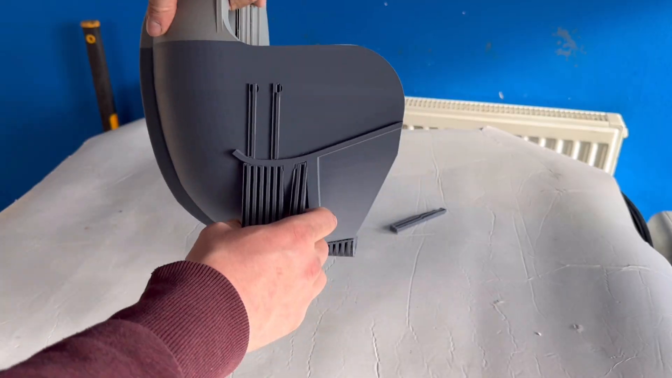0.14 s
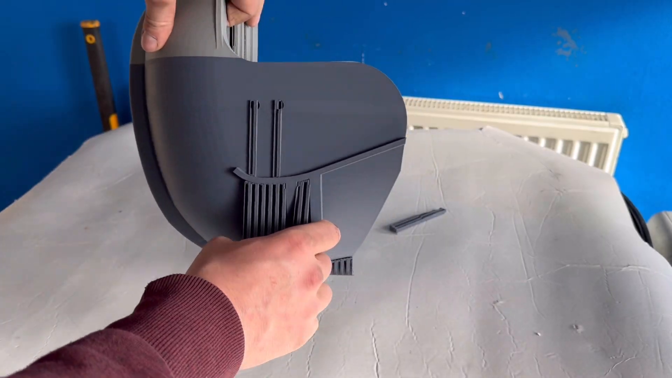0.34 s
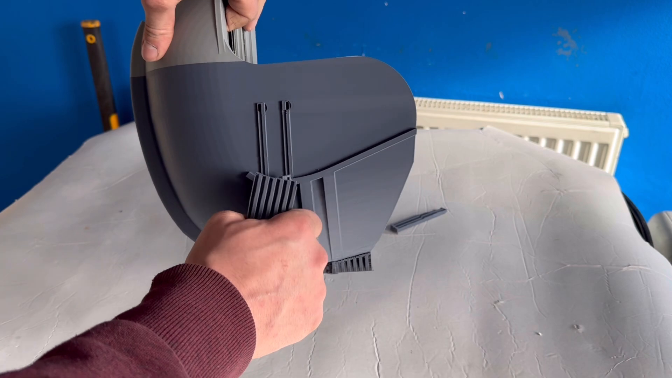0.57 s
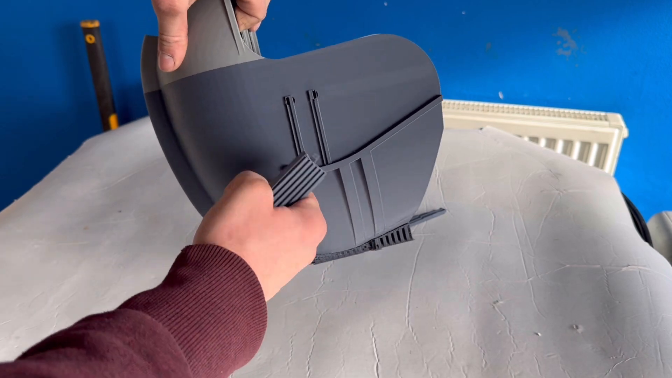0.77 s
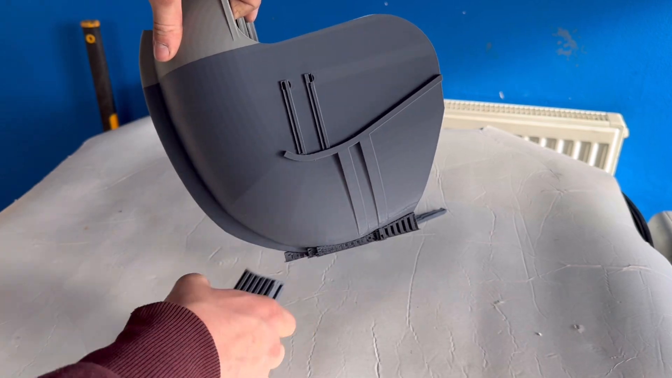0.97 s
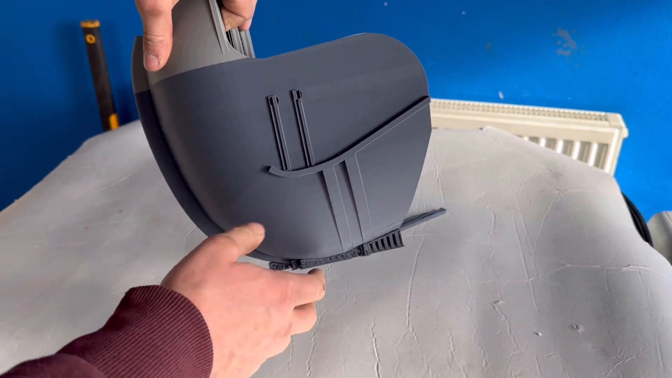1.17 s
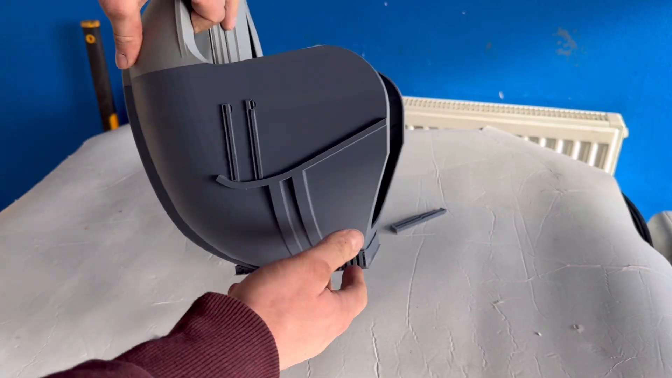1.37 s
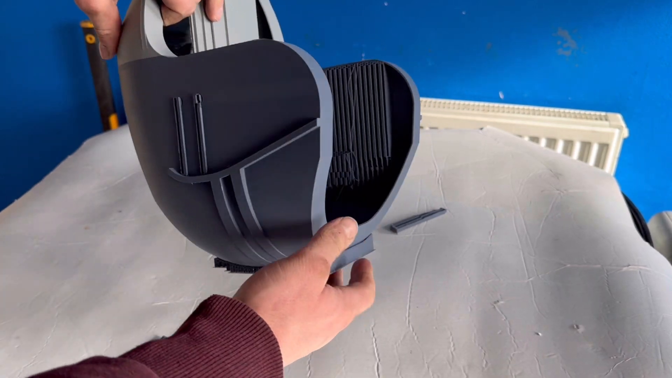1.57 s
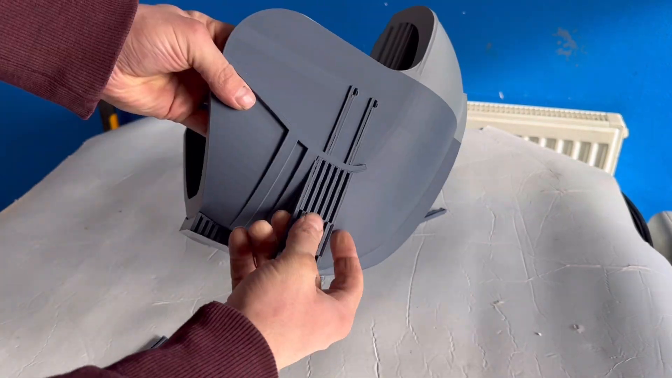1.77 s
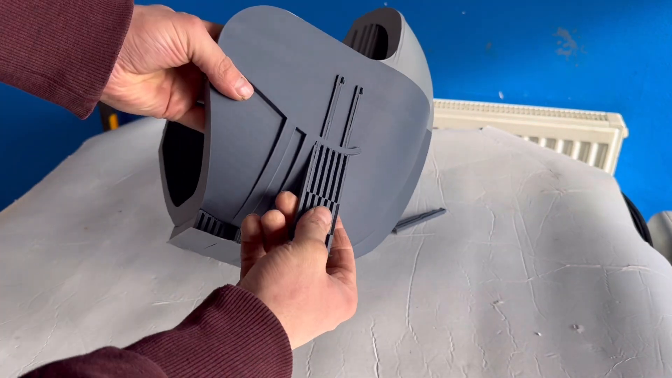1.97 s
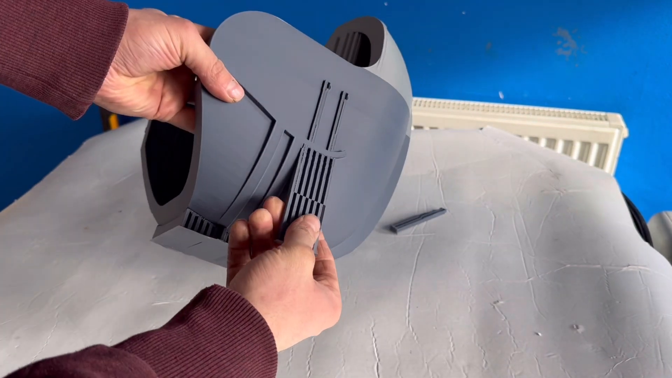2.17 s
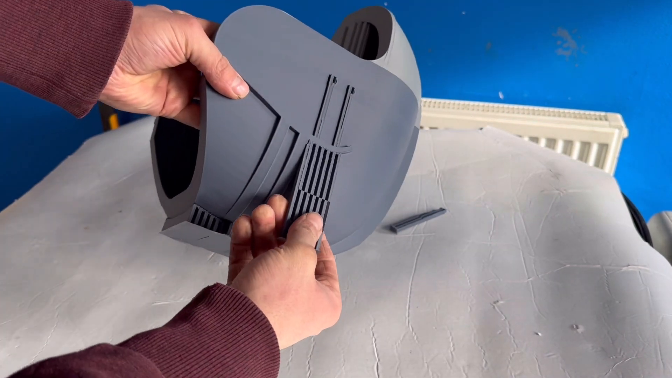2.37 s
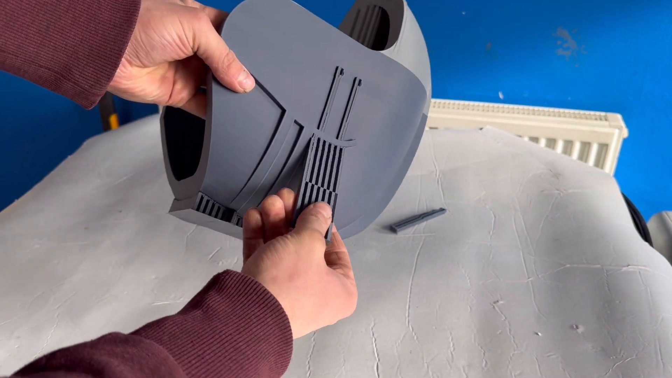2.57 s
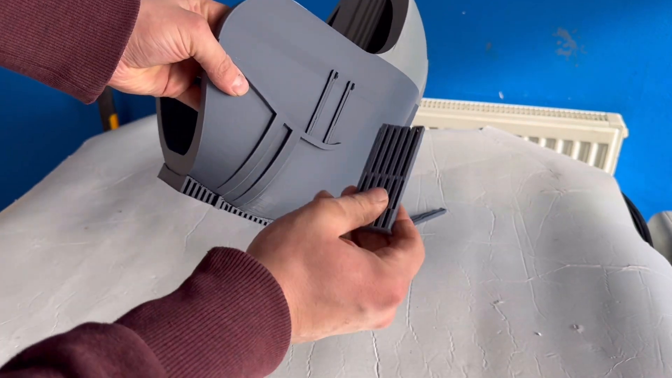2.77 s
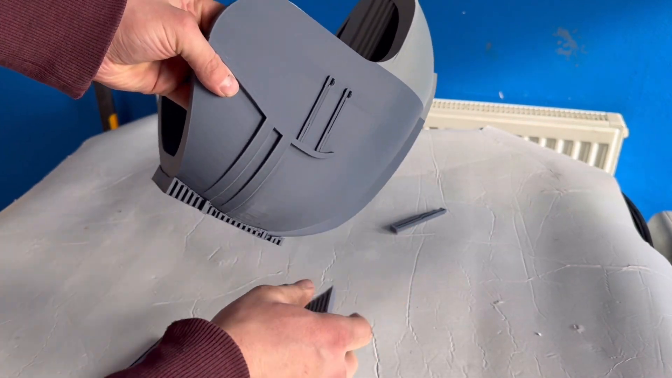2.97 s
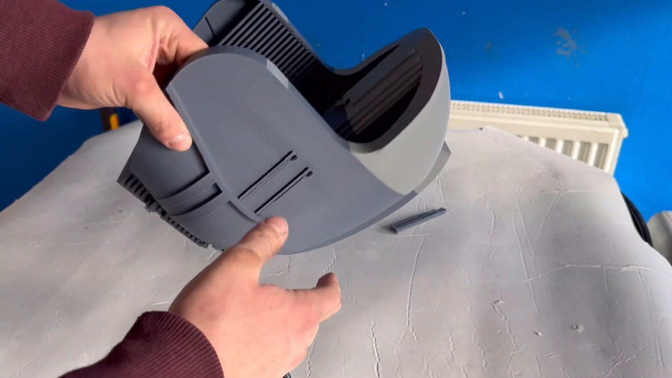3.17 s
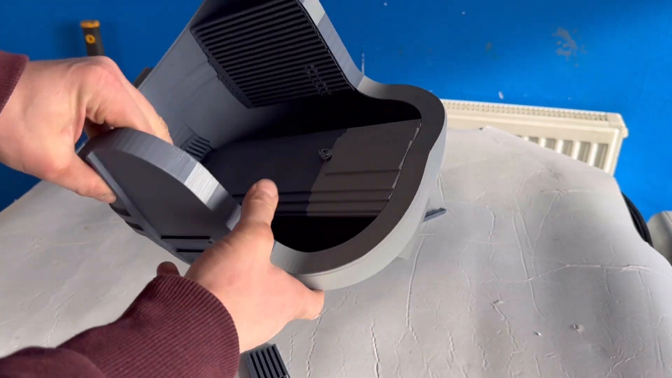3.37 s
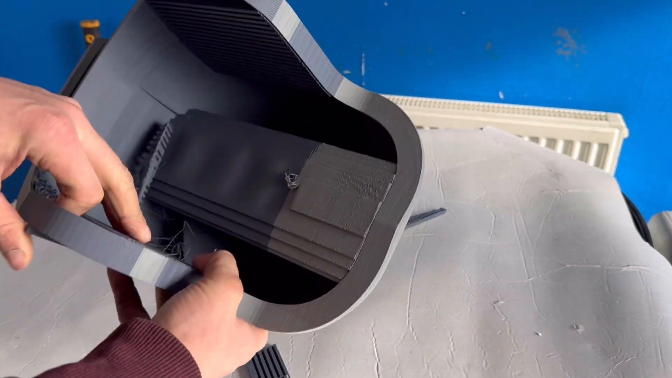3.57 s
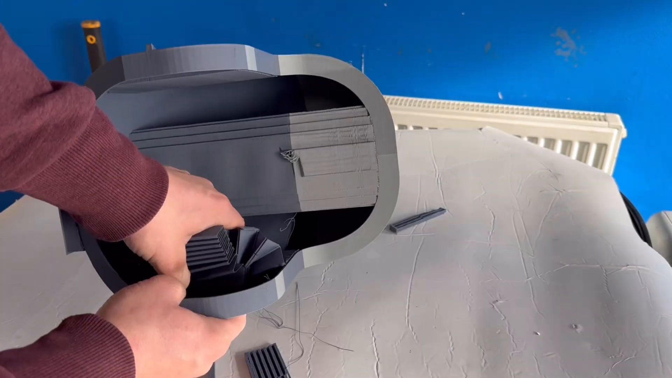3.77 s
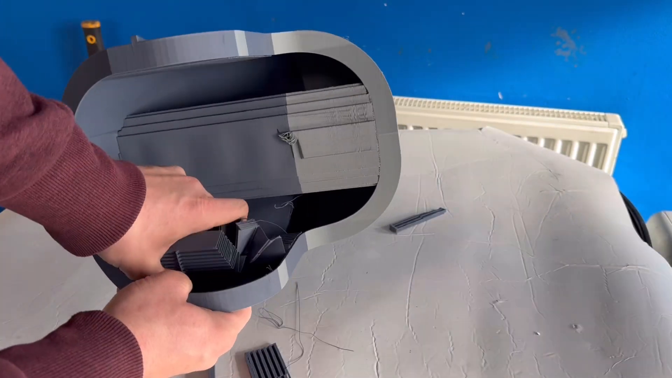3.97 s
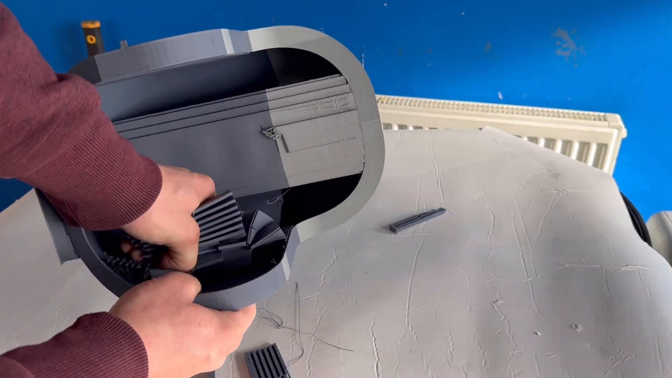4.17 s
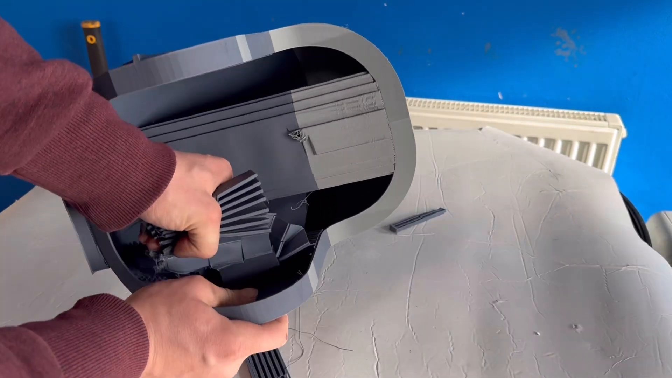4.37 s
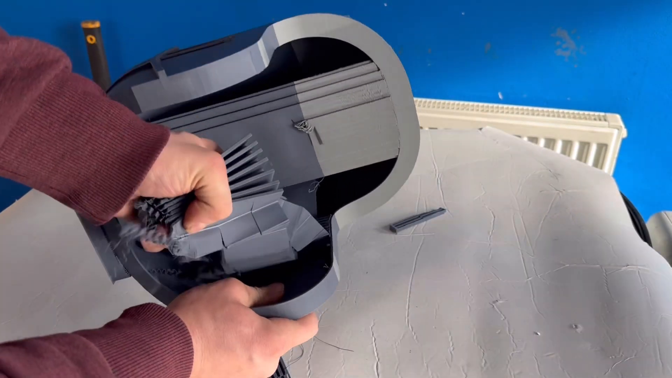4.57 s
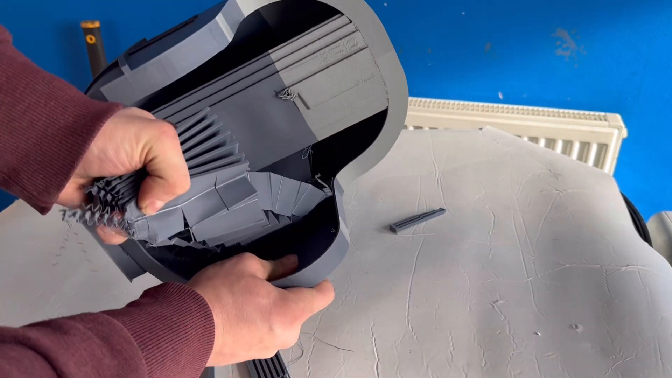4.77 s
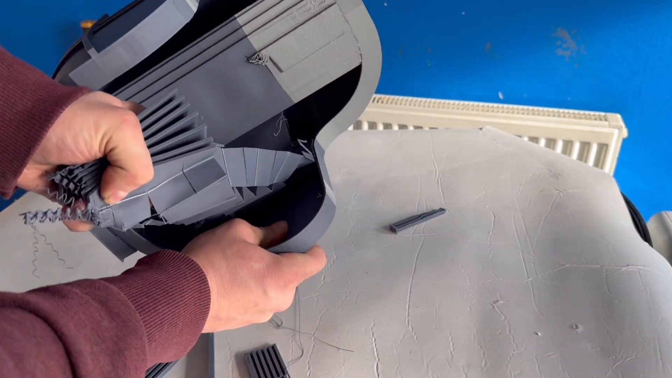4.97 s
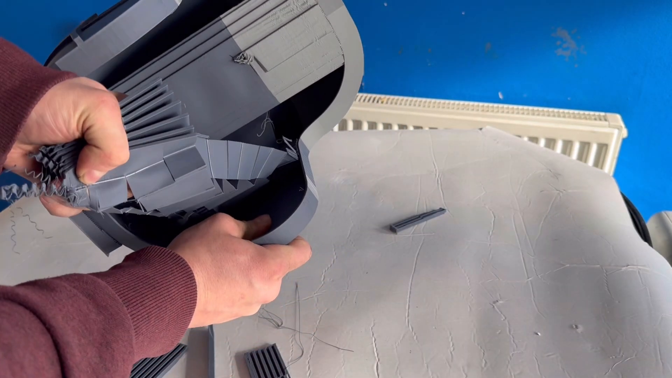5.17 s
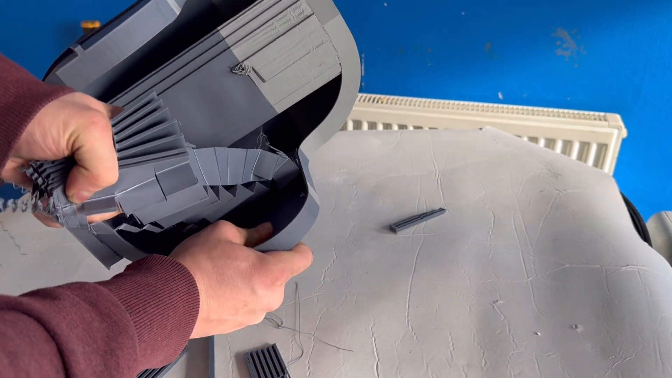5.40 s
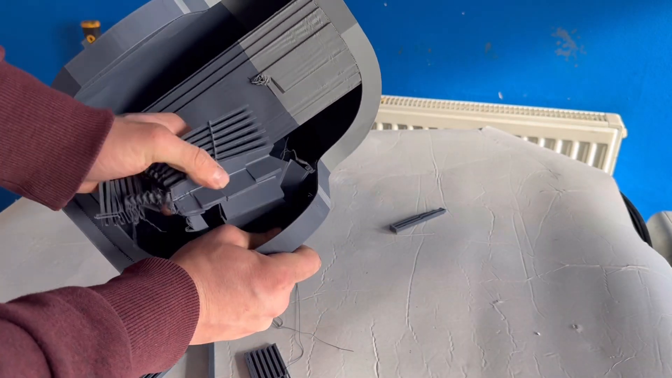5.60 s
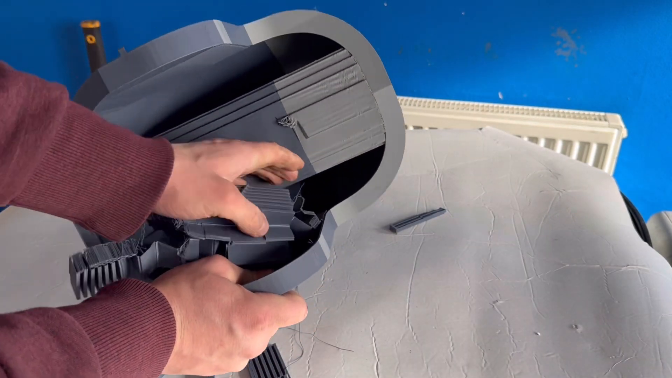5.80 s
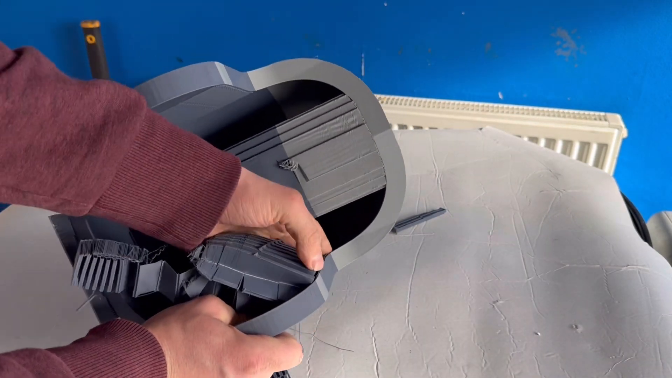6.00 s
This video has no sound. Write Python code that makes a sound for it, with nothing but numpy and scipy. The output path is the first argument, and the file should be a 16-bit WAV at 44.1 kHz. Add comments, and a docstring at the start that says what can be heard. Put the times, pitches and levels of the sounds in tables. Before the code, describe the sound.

Close stereo sound in a small, hard room: soft handling bumps and tiny ticks, a crisp plastic crack, a loose bit landing, faint creaking crackle, another brief snap, more bits dropping and a hand clacking onto the shell. Then supports inside the hollow part tear away in a rapid volley of bright cracks and boxy pops, with isolated snaps afterwards and a short rough scrape at the end.

```python
"""Struts snap singly and in rips as hands tear the thin lattice off a hollow 3D-printed plastic shell.
Close by, the strained lattice crackles and the shell answers each release with a short hollow note.
Loose pieces land on the table, the last support judders out and handling gives dull bumps.
Ragged forces ring damped modes and coloured cracks; noise gives the tails of a small, hard room.
Two microphones hear it: alike in the bass, apart in the treble, the left one nearer."""
import sys
import numpy as np
from scipy import signal
from scipy.fft import rfft, irfft, next_fast_len
from scipy.io import wavfile
from scipy.ndimage import map_coordinates

SR = 44100
rng = np.random.default_rng(int(sys.argv[2]) if len(sys.argv) > 2 else 0)


def pcm_store(signal):
    """Save signal as 16-bit PCM."""
    levels = np.round(np.clip(np.atleast_2d(signal), -1, 1) * 32767)
    wavfile.write(sys.argv[1], SR, levels.astype(np.int16).T)


N = 266364

# Event levels are at the source, ahead of each function's trims, the room and the microphones.
# breaking struts and knocks of the lattice on the shell:
# (time [s], crack [dB], lattice clack [dB], strut pitch [Hz], strut ring [dB])
STRUT_SNAPS = [(0.461, -21, -37, 960, -30.5), (0.51, -22, -26.5, 2610, -22.5),
               (1.326, -37.5, -49, 2030, -49), (1.671, -40, -45, 950, -47),
               (1.701, -30.5, -48.5, 2600, -42), (1.837, -30, -44.5, 1800, -44.5),
               (1.87, -33, -49, 1900, -40.5), (2.593, -26, -36.5, 1130, -43),
               (2.604, -22.5, -29.5, 1160, -34), (2.851, -59, -48.5, 3370, -55),
               (3.719, -22.5, -21.5, 1207, -31.5), (3.731, -28.5, -21.5, 1200, -25),
               (3.916, -35, -29.5, 7750, -50), (4.022, -37.5, -28.5, 7940, -35.5),
               (4.052, -25, -21, 910, -25), (4.104, -34.5, -31.5, 7200, -29), (4.16, -32, -29.5, 1220, -35),
               (4.202, -24, -21, 1300, -21), (4.29, -27, -28.5, 1360, -30),
               (4.3, -18.5, -14.5, 1400, -23.5), (4.335, -21, -18, 1290, -24),
               (4.388, -23, -17.5, 3090, -20.5), (4.416, -29.5, -22, 1370, -17),
               (4.448, -20.5, -18.5, 1454, -18), (4.479, -23, -24.5, 1430, -23.5),
               (4.569, -13.5, -18.5, 1490, -23), (4.619, -20, -25, 1440, -28),
               (4.64, -21.5, -15.5, 1220, -18), (4.664, -31.5, -23.5, 4600, -25.5),
               (4.688, -26.5, -30.5, 1560, -24.5), (4.732, -25.5, -37, 1880, -30),
               (4.821, -31, -21.5, 1560, -23), (4.849, -38, -33, 6150, -33), (4.909, -23, -22.5, 4200, -34),
               (4.923, -40, -36, 740, -27), (4.966, -32.5, -33, 4070, -38), (4.99, -30, -29.5, 1730, -35),
               (5.026, -27, -31, 4700, -26.5), (5.114, -27, -21.5, 1060, -27.5),
               (5.129, -29.5, -38.5, 1800, -31), (5.22, -20, -15, 1380, -19),
               (5.46, -37.5, -36, 1720, -37.5), (5.786, -27.5, -24, 4720, -29.5)]
# whole rows of struts giving way:
# (time [s], length [s], crackle [dB], lattice clack [dB], hollow boom [dB])
ROW_RIPS = [(0.519, 0.04, -25.5, -29, -29.5), (1.679, 0.09, -53, -51, -45), (2.613, 0.04, -46, -41, -36),
            (3.729, 0.021, -27, -30, -31.5), (4.394, 0.06, -21.5, -24, -25.5),
            (4.575, 0.085, -24, -26.5, -33.5), (5.228, 0.039, -19, -22.5, -32)]
# loose pieces landing and bouncing:
# (time [s], clatter [dB], tick [dB], table ring [dB], table thud [dB], clatter contact cut-off [Hz])
PIECE_DROPS = [(1.041, -47, -46.5, -71, -70, 6000), (1.049, -42, -35, -65, -52, 6000),
               (1.058, -35.5, -30.5, -33.5, -40, 4600), (1.243, -39.5, -43.5, -45, -44.5, 5180),
               (3.015, -36, -46.5, -41.5, -46, 2570), (3.031, -31.5, -34, -40, -34, 2750),
               (3.128, -37.5, -41, -58, -41.5, 3100)]
# dull bumps of handling and of the hardest jerks: (time [s], level [dB])
HANDLING_BUMPS = [(0.076, -49), (0.13, -38), (0.174, -30.5), (0.23, -47), (0.255, -37), (0.907, -39.5),
                  (0.934, -45), (0.979, -44.5), (4.577, -36.5), (5.234, -37)]
# the shell's hollow modes, heard from either side:
# (frequency [Hz], width [Hz], outside level [dB], inside level [dB])
SHELL_MODES = [(325, 14, -7, -17), (369.6, 27.4, -3, 4.5), (418.2, 12.4, 6, 3.5), (550, 13, -22, -18),
               (759, 59, -10.5, -11.5), (842, 18, -7, -8.5), (1024, 15, -7, -12)]
# modes of the lattice: (frequency [Hz], width [Hz], level [dB])
LATTICE_MODES = [(765, 45, 8), (1050, 450, -1), (1330, 600, -1), (1850, 810, 0), (2520, 430, -8),
                 (4410, 1900, -1.5)]
# modes of a loose piece: (frequency [Hz], width [Hz], level [dB])
PIECE_MODES = [(930, 330, 14), (1350, 1800, 6), (1850, 700, 11.5), (2360, 560, 1), (3470, 800, 2)]
# spectrum of a crack: (frequency [Hz], density [dB per Hz])
CRACK_SPECTRUM = [(500, -39.5), (2500, 0.5), (4500, -7), (6500, 4), (8500, 10.5), (11000, 8.5), (15500, 8),
                  (17000, -15)]
# spectrum of the crackle: (frequency [Hz], density [dB per Hz])
CRACKLE_SPECTRUM = [(60, -16), (250, -11), (600, 0.5), (800, 1.5), (1400, 0), (2200, 2), (3300, -3),
                    (5000, -7), (6800, -1), (8600, -7), (11000, -9.5), (15500, -4.5)]
# spectrum of the still air: (frequency [Hz], density [dB per Hz])
AIR_SPECTRUM = [(20, -23), (60, -0.5), (200, -6), (400, -14), (700, -16), (2000, -44.5), (6000, -36.5),
                (16000, -41)]
# agreement of the two microphones: (frequency [Hz], left-right likeness [-1 to 1])
MIC_LIKENESS = [(130, 0.9), (330, 0.92), (650, -0.07), (1400, 0.5), (3000, -0.13), (5000, 0.2),
                (7000, -0.38), (9000, -0.96), (11500, -0.64), (15000, 0.51)]
# lean towards the left microphone: (frequency [Hz], left over right [dB])
LEFT_LEAN = [(100, 0.5), (400, 3.5), (2400, 0.5), (4400, 5), (8000, 3), (15000, -1.5)]
# reverberation time: (frequency [Hz], time to fall 60 dB [s])
ROOM_DECAY = [(150, 0.45), (400, 0.53), (1000, 0.49), (2800, 0.45), (7000, 0.45), (15000, 0.23)]
# strength of the room: (frequency [Hz], level against the direct sound [dB])
ROOM_LEVEL = [(100, -1.5), (400, -5.5), (1000, -2.5), (3000, 0.5), (8000, -2), (15000, -11)]
# low modes of the thick wall: (frequency [Hz], width [Hz], level [dB])
WALL_MODES = [(102, 90, -10.5), (145, 32, -16), (215.2, 20, 2), (268, 77, -4)]
# ringing modes of the table: (frequency [Hz], width [Hz], level [dB])
TABLE_RING_MODES = [(560, 50, 1), (596, 28, 5), (652, 25, -4)]
# thudding modes of the table: (frequency [Hz], width [Hz], level [dB])
TABLE_THUD_MODES = [(160, 49, -1.7), (306, 107, -0.75)]
# a thin freed strand twangs: (time [s], pitch [Hz], level [dB], applied 60 dB decay [s])
STRAND_TWANGS = [(0.899, 3250, -49.5, 0.33)]
# pulls on the lattice: (start [s], end [s], crackle [dB], rubbing on the shell [dB])
LATTICE_PULLS = [(0, 0.4, -54, -62), (0.446, 0.53, -42, -48), (1.205, 1.63, -56, -66),
                 (1.655, 1.9, -48.5, -63), (2.1, 2.184, -57, -72.5), (2.522, 2.62, -49, -68),
                 (2.6, 2.606, -38.5, -57.5), (3.313, 3.459, -53, -49), (3.496, 3.704, -45, -41.5),
                 (3.8, 4.14, -38.5, -42), (4.094, 4.425, -35, -39), (4.494, 4.65, -43.5, -49.5),
                 (4.842, 4.97, -33, -44), (5.37, 5.44, -44, -47), (5.493, 5.72, -28, -46),
                 (5.871, 5.93, -38, -41)]
# a fingertip slides over fine print ridges: (start [s], end [s], pitch [Hz], width [Hz], level [dB])
FINGER_SLIDE = (2.02, 2.4, 4497, 800, -75)
# the free hand slaps onto the shell: (time [s], wall rap [dB])
HAND_SLAPS = [(3.273, -32.5)]
# the thin wall under that hand: (frequency [Hz], width [Hz], level [dB])
PANEL_MODES = [(1030, 300, 6), (1950, 800, -1), (2700, 600, -1)]
# judders of the torn support over the shell:
# (start [s], end [s], grind [dB], squeak [dB], hollow groan [dB])
SUPPORT_SCRAPES = [(5.539, 5.54, -29.5, -31, -56), (5.562, 5.535, -25, -27, -39.5),
                   (5.591, 5.59, -33.5, -34, -42), (5.619, 5.61, -30, -37.5, -51.5),
                   (5.646, 5.65, -34.5, -35, -37), (5.675, 5.679, -35.5, -31, -40),
                   (5.685, 5.7, -37.5, -46.5, -37), (5.883, 5.903, -37, -42.5, -41)]
# grinding modes of the dragged support: (frequency [Hz], width [Hz], level [dB])
GRIND_MODES = [(1006, 170, 0), (1370, 290, 6.5), (1680, 220, -3.5), (2630, 290, -8.5)]
# squeaking modes of the dragged support: (frequency [Hz], width [Hz], level [dB])
SQUEAK_MODES = [(4300, 730, 11.5), (5200, 990, 4.5), (8400, 1400, -5.5)]
# groan of the hollow behind it: (frequency [Hz], width [Hz], level [dB])
GROAN_MODES = [(750, 45, 0)]
# air in the gap under the big support, higher the wider the gap: (time [s], pitch [Hz], level [dB])
GAP_PATH = [(3.5, 1188, -22.5), (3.75, 1232, 1.5), (4.2, 1350, -1), (4.45, 1428, -2.5), (4.85, 1560, -9.5),
            (5.22, 1380, -6), (5.3, 1690, -6.5), (5.9, 1380, -3.5)]
# low rumbles as the part shifts in the grip: (start [s], end [s], level [dB])
GRIP_RUMBLES = [(0.036, 0.295, -53), (0.899, 1.045, -55.5)]
# hair-thin ties that part with only a bright crack: (time [s], crack [dB])
TIE_CRACKS = [(0.056, -40.5), (0.305, -44.5), (0.331, -41), (0.376, -31), (0.424, -35.5), (0.449, -34),
              (0.898, -40.5), (1.616, -44), (1.758, -38.5), (1.78, -34.5), (1.89, -34), (2.501, -33.5),
              (2.518, -30), (2.546, -33), (2.57, -30.5), (3.633, -33), (3.899, -33), (4.143, -33),
              (4.189, -30.5), (4.537, -25.5), (5.211, -22.5)]
# the relieved wall springs back and pumps the hollow; the 3.274 s row is the boom of the hand slapping the
# shell: (time [s], level [dB], pitch [Hz])
WALL_FLEXES = [(0.515, -30, 320), (0.536, -28, 300), (0.545, -25.5, 425), (1.67, -35.5, 410),
               (1.696, -39, 352), (1.718, -39.5, 410), (1.753, -44, 321), (2.601, -34, 430.5),
               (2.617, -31, 431), (3.274, -25.5, 378), (3.632, -38, 378), (3.669, -35, 394),
               (3.722, -19.5, 403.5), (3.913, -30.5, 376), (4.052, -21.5, 407), (4.201, -17, 394),
               (4.24, -24, 396), (4.266, -25, 380), (4.296, -14.5, 342), (4.385, -14, 397),
               (4.412, -12.5, 351.5), (4.426, -16, 358.4), (4.446, -21, 367), (4.477, -15, 382),
               (4.57, -16, 408.6), (4.595, -21.5, 396), (4.619, -19.5, 395), (4.641, -18, 413),
               (4.921, -30.5, 365), (4.988, -35, 358), (5.173, -35.5, 364), (5.226, -26.5, 215),
               (5.246, -25, 363.5), (5.555, -32.5, 365), (5.794, -30, 362)]

TOP_HZ = 16200
RING = np.arange(8192) / SR  # time axis of one struck sound, s
BLOW = SR // 100  # 10 ms, in samples
# the shell is turned over and the hands move inside: turn complete at, length of the turn
INSIDE_FROM_S, TURN_S = 3.5, 0.2
# after a crack the freed lattice springs back: delay, level against the first clack
RECOIL_S, RECOIL_DB = 0.011, -13.5
# the split before a strut breaks: lead, level against its crack
SPLIT_S, SPLIT_DB = 0.0039, -16.5
BOOM_DB = -13  # the shell's ring, against the listed clack
# in a rip: time from strut to strut, fall in level over its length
UNZIP_S, UNZIP_FALL_DB = 0.008, 4
# the grip takes hold, strain builds through the pull, then the hand eases off
GRIP_S, BUILD_DB, EASE_S = 0.031, 2.5, 0.051
# fingers only holding the shell between pulls, before the trims in bending()
HOLD_CRACKLE_DB, HOLD_RUB_DB = -106, -70.5
# random ties: mean rate, level against the strain's crackle gain, scatter scale
TIES_PER_S, TIE_DB, TIE_SCATTER_DB = 24, -3, 5
FLEX_S = 0.02  # length of the hollow note
# the wall's thud against the flex, stronger under the big support inside the shell
OUTER_THUD_DB, INNER_THUD_DB = -27, -14.5


def amp(db):
    """Turn decibels into gain."""
    return 10 ** (np.asarray(db) / 20)


def unit(x):
    """Scale to rms 1."""
    return x / np.sqrt(np.mean(x ** 2) + 1e-20)


def along(points, hz):
    """Read (frequency [Hz], value) points on a log frequency axis."""
    f, v = np.transpose(points)
    return np.interp(np.log(hz + 1), np.log(f), v)


def grid(x):
    """Give the frequencies of a signal's spectrum."""
    return np.fft.rfftfreq(x.shape[-1], 1 / SR)


def resonances(modes, hz):
    """Sum the causal responses of damped modes."""
    return sum(amp(db) * 1j * hz * w / (c * c - hz * hz + 1j * hz * w) for c, w, db in modes)


def colour(points, hz):
    """Give a spectrum a causal, minimum-phase response by folding its cepstrum."""
    cepstrum = irfft(np.log(amp(along(points, hz))))
    half = len(cepstrum) // 2
    return np.exp(rfft(np.r_[cepstrum[0], 2 * cepstrum[1:half], np.zeros(half)]))


def soft(hz, cutoff_hz):
    """A soft contact passes little above its cut-off."""
    return signal.freqs(*signal.butter(2, 1, analog=True), hz / cutoff_hz)[1]


def ports(hz):
    """Mid and side weights: the two microphones agree in the bass and part in the treble."""
    turn = np.arccos(np.clip(along(MIC_LIKENESS, hz), -1, 1)) / 2
    return np.array([np.cos(turn), np.sin(turn)])


def sound(force, response, shape):
    """A long two-row force drives a body, as mid and side of joint rms 1."""
    size = 2 * next_fast_len(N // 2 + len(RING))
    padded = np.pad(force, ((0, 0), (0, size - N)))
    hz = grid(padded)
    return unit(irfft(rfft(padded) * response(shape, hz) * ports(hz))[:, :N])


def blow(ring):
    """Scale a short sound to the energy of 10 ms at rms 1."""
    return ring * np.sqrt(BLOW / np.sum(ring ** 2))


def push_shape(length):
    """A push rises to its peak at a quarter of its nominal length, then dies away."""
    u = RING / max(length / 4, 1e-4)
    return u * np.exp(-u)


def strike(body, length):
    """A crack runs as a short ragged force and rings a body."""
    force = rng.standard_normal((2, len(RING))) * push_shape(length)
    ring = irfft(rfft(force) * body)
    # random forces leave the body's balance of mid and side unchanged
    wanted = np.linalg.norm(body, axis=1, keepdims=True)
    return blow(ring * wanted / np.linalg.norm(ring, axis=1, keepdims=True))


def knock(body, length):
    """One smooth push rings a heavy body alike every time; only its side part is diffuse."""
    mid = blow(irfft(rfft(push_shape(length)) * body[0]))
    side = strike(body, length)[1]
    return blow(np.array([mid, side]))


def add(track, s, x):
    """Mix x into the track at time s."""
    part = track[:, max(round(s * SR), 0):][:, :x.shape[1]]
    part += x[:, :part.shape[1]]


def grains(rate, spread_db):
    """Random tiny fractures, rate a second, a few much larger than the rest."""
    size = amp(spread_db * np.minimum(rng.exponential(size=N), 3)) * (rng.random(N) < rate / SR)
    life = np.exp(-RING[:256] / 0.00099)
    power = signal.fftconvolve(size ** 2, life ** 2)[:N]
    return np.sqrt(np.abs(power)) * rng.standard_normal((2, N))


def wobble(rate):
    """Draw a smooth random curve, rate knots a second."""
    return map_coordinates(rng.standard_normal(N // 100), [np.arange(N) * rate / SR], mode="mirror")


def strut(hz, depth_db, count=14):
    """Every strut has its own size, so its own peaks and dips in the spectrum."""
    points = np.c_[np.geomspace(700, TOP_HZ, count), depth_db * rng.standard_normal(count)]
    return amp(along(points, hz))


def shell_modes(inside):
    """The shell's modes balance differently from its outside and its inside."""
    return [(hz, width, inside_db if inside else outside_db)
            for hz, width, outside_db, inside_db in SHELL_MODES]


def booming(force):
    """A long force rings the shell, whose open side turns to the listener."""
    turned = np.interp(np.arange(N) / SR, [INSIDE_FROM_S - TURN_S, INSIDE_FROM_S], [0, 1])
    outside = sound(force, resonances, shell_modes(False))
    inside = sound(force, resonances, shell_modes(True))
    return (1 - turned) * outside + turned * inside


def radiated(x, corner_hz=115):
    """Thin plastic moves little air in the deep bass."""
    return signal.sosfilt(signal.butter(2, corner_hz, "highpass", fs=SR, output="sos"), x)


def still_air(level_db=-67):
    """The quiet place between sounds is steady coloured noise."""
    return amp(level_db) * sound(rng.standard_normal((2, N)), colour, AIR_SPECTRUM)


def room(x, gap=0.004, count=12):
    """Mid and side reach the walls by different paths, which change gradually as the shell is moved about."""
    out, step = np.zeros((2, N)), N // count + 1
    for centre in np.arange(count + 1) * step:
        span = np.arange(max(centre - step, 0), min(centre + step, N))
        part = x[:, span] * np.cos(np.pi / 2 * (span - centre) / step)
        # one decaying noise tail for each path from (mid, side) to (mid, side)
        noise = rng.standard_normal((2, 2, SR * 3 // 4))
        hz, age, z = signal.stft(noise, SR, nperseg=256)
        t60 = along(ROOM_DECAY, hz)[:, None]
        gain = amp(along(ROOM_LEVEL, hz))[:, None] * np.sqrt(2 * np.log(1000) / (t60 * SR))
        decay = np.exp(-np.log(1000) * age / t60)
        tails = signal.istft(z * ports(hz)[:, :, None] * gain * decay, SR, nperseg=256)[1]
        wet = signal.fftconvolve(part[:, None], tails, axes=2).sum(axis=0)
        add(out, span[0] / SR + gap, wet)
    return out


def rumble(pitch_hz=68, width_hz=60, fade=0.014):
    """The shifting grip rumbles as noise through a low, broad resonance."""
    t, level = np.arange(N) / SR, np.zeros(N)
    for start, end, db in GRIP_RUMBLES:
        level += amp(db) * np.interp(t, [start - fade, start, end - fade, end], [0, 1, 1, 0])
    noise = rng.standard_normal((2, N))
    return level * sound(noise, lambda modes, hz: resonances(modes, hz) ** 2, [(pitch_hz, width_hz, 0)])


def bumps(pitch_hz=68, width_hz=50, length=0.014, cutoff_hz=160):
    """Handling gives soft, heavily damped pushes."""
    out, hz = np.zeros((2, N)), grid(RING)
    mode = resonances([(pitch_hz, width_hz, 0)], hz)
    body = ports(hz) * mode ** 2 * np.abs(soft(hz, cutoff_hz))
    for s, db in HANDLING_BUMPS:
        add(out, s, amp(db) * strike(body, length))
    return out


def slide(fade=0.091):
    """A fingertip on the ridges gives a faint narrow hiss."""
    start, end, pitch, width, db = FINGER_SLIDE
    touch = np.interp(np.arange(N) / SR, [start - fade, start, end - fade, end], [0, 1, 1, 0])
    noise = rng.standard_normal((2, N))
    hiss = sound(noise, lambda modes, hz: resonances(modes, hz) ** 2, [(pitch, width, 0)])
    return amp(db) * touch * hiss


def twang(width_hz=520):
    """A springy strand flicks free and buzzes out as decaying narrow noise."""
    out, hz = np.zeros((2, N)), grid(RING)
    for s, pitch, db, t60 in STRAND_TWANGS:
        noise = rng.standard_normal((2, len(RING)))
        buzz = irfft(rfft(noise) * resonances([(pitch, width_hz, 0)], hz) ** 2)
        add(out, s, amp(db - 60 * RING / t60) * buzz / np.abs(buzz).max())
    return out


def drops(clatter_db=1, ring_db=-1, thud_db=-1):
    """A light piece clatters on the covered table, which rings and thuds under it."""
    out, hz = np.zeros((2, N)), grid(RING)
    pair = ports(hz)
    tick = pair * colour(CRACK_SPECTRUM, hz)
    piece = pair * resonances(PIECE_MODES, hz)
    ring = pair * resonances(TABLE_RING_MODES, hz)
    thud = pair * resonances(TABLE_THUD_MODES, hz)
    for s, clatter_level, tick_level, ring_level, thud_level, cutoff in PIECE_DROPS:
        add(out, s, amp(clatter_level + clatter_db) * strike(piece * soft(hz, cutoff), length=0.0095))
        add(out, s, amp(tick_level) * strike(tick, length=0.0027))
        add(out, s, amp(ring_level + ring_db) * knock(ring, length=0.0017))
        add(out, s, amp(thud_level + thud_db) * knock(thud, length=0.0014))
    return out


def slaps(cutoff_hz=3000):
    """A hand lands on the shell and the wall gives a compact clack."""
    out, hz = np.zeros((2, N)), grid(RING)
    panel = ports(hz) * soft(hz, cutoff_hz) * resonances(PANEL_MODES, hz)
    for s, rap_level in HAND_SLAPS:
        add(out, s, amp(rap_level) * strike(panel, length=0.0078))
    return out


def scrapes(edge=0.0053):
    """Ribs stick and slip over the print ridges; every slip rings the support and the hollow behind it."""
    t, out = np.arange(N) / SR, np.zeros((2, N))
    slips = grains(rate=900, spread_db=1.0)
    bodies = [sound(slips, resonances, modes) for modes in (GRIND_MODES, SQUEAK_MODES, GROAN_MODES)]
    for start, end, *levels in SUPPORT_SCRAPES:
        contact = np.interp(t, [start - edge, start + edge, end - edge, end + edge], [0, 1, 1, 0])
        out += contact * sum(amp(db) * body for db, body in zip(levels, bodies))
    return out


def flexes(swell_lag=0.003, thud_lag=0.006, push=0.0016):
    """The wall gives with a thud, and a short hollow note swells and stops."""
    out, hz = np.zeros((2, N)), grid(RING)
    swell = np.sin(np.pi * np.minimum(RING / FLEX_S, 1)) ** 2
    wall = ports(hz) * resonances(WALL_MODES, hz)
    for s, db, pitch in WALL_FLEXES:
        note = np.sqrt(2) * swell * np.sin(2 * np.pi * pitch * RING)
        thud_db = INNER_THUD_DB if s > INSIDE_FROM_S else OUTER_THUD_DB
        add(out, s + swell_lag, amp(db) * np.outer([1, 0], note))  # mid only
        add(out, s + thud_lag, amp(db + thud_db) * knock(wall, push))
    return out


def gap_ring(x, width_hz=130):
    """The air in the gap is one resonance that glides with the gap's width."""
    times, pitch, db = np.transpose(GAP_PATH)
    t = np.arange(N) / SR
    turning = np.exp(2j * np.pi * np.cumsum(np.interp(t, times, pitch)) / SR)
    keep = np.exp(-np.pi * width_hz / SR)
    # shift the gliding pitch to zero, smooth there, and shift back
    smooth = signal.lfilter([1 - keep], [1, -keep], x / turning)
    return 2 * amp(np.interp(t, times, db)) * np.real(turning * smooth)


def strain():
    """Gains of crackle and rubbing: every pull takes hold, builds and eases off."""
    t = np.arange(N) / SR
    gains = np.outer(amp([HOLD_CRACKLE_DB, HOLD_RUB_DB]), np.ones(N))
    for start, end, crackle_level, rub_level in LATTICE_PULLS:
        held = np.interp(t, [start - GRIP_S, start, end, end + EASE_S], [0, 1, 1, 0])
        build = amp(np.interp(t, [start, end], [-BUILD_DB, 0]))
        gains += np.outer(amp([crackle_level, rub_level]), held * build)
    return gains


def bending(crackle, rub, crackle_db=-5, rub_db=-2, jerk_db=3):
    """Strained ribs tick against each other in jerks while fingers and lattice slip on the shell."""
    ticks = sound(grains(rate=410, spread_db=3.5), colour, CRACKLE_SPECTRUM)
    slips = booming(grains(rate=350, spread_db=3.5))
    jerks = amp(jerk_db * np.clip(wobble(rate=60), -2, 2))
    return jerks * (amp(crackle_db) * crackle * ticks + amp(rub_db) * rub * slips)


def ties(crackle, length=0.0045, variety_db=3):
    """Hair-thin ties part with small bright cracks, some timed, some random and as loud as the strain is high."""
    out, hz = np.zeros((2, N)), grid(RING)
    crack = ports(hz) * colour(CRACK_SPECTRUM, hz)
    for s, db in TIE_CRACKS:
        add(out, s, amp(db) * strike(crack * strut(hz, variety_db), length))
    for start in np.flatnonzero(rng.random(N) < TIES_PER_S / SR):
        size = crackle[start] * amp(TIE_DB + TIE_SCATTER_DB * rng.uniform(-1.2, 1))
        add(out, start / SR, size * strike(crack * strut(hz, variety_db), length))
    return out


def rips(boom_db=-2, snap_length=0.006, variety_db=3):
    """One failure overloads the next strut, so a whole row unzips, each strut with its own colour."""
    t, hz = np.arange(N) / SR, grid(RING)
    out, boom = np.zeros((2, N)), np.zeros(N)
    crackle = ports(hz) * colour(CRACKLE_SPECTRUM, hz)
    lattice = ports(hz) * resonances(LATTICE_MODES, hz)
    for s, length, crackle_level, clack_level, boom_level in ROW_RIPS:
        boom += amp(boom_level + boom_db) * ((t > s) & (t < s + length))
        for age in np.arange(0, length, UNZIP_S):
            at = s + age + UNZIP_S * rng.uniform(-1, 1) / 3
            own = strut(hz, variety_db)
            fall_db = UNZIP_FALL_DB * age / length
            add(out, at, amp(crackle_level - fall_db) * strike(crackle * own, snap_length))
            add(out, at, amp(clack_level - fall_db) * strike(lattice * own, snap_length))
    return out + boom * booming(grains(rate=650, spread_db=2.8))


def snaps(clack_db=-2, ring_db=-3, clack_lag=0.001187, boom_lag=0.005, boom_length=0.0073,
          crack_length=0.0045, clack_length=0.0072, variety_db=3, damping=0.1):
    """A strut splits, cracks and rings at its pitch, the lattice clacks and recoils, the heavier shell follows."""
    out, hz = np.zeros((2, N)), grid(RING)
    pair = ports(hz)
    crack = pair * colour(CRACK_SPECTRUM, hz)
    lattice = pair * resonances(LATTICE_MODES, hz)
    for s, crack_level, clack_level, pitch, ring_level in STRUT_SNAPS:
        own = strut(hz, variety_db)
        tone = pair * resonances([(pitch, damping * pitch, 0)], hz)
        shell = pair * resonances(shell_modes(s > INSIDE_FROM_S), hz)
        clack = clack_level + clack_db
        add(out, s - SPLIT_S, amp(crack_level + SPLIT_DB) * strike(crack * own, crack_length))
        add(out, s, amp(crack_level) * strike(crack * own, crack_length))
        add(out, s, amp(ring_level + ring_db) * strike(tone, crack_length))
        add(out, s + clack_lag, amp(clack) * strike(lattice * own, clack_length))
        add(out, s + RECOIL_S, amp(clack + RECOIL_DB) * strike(lattice * own, clack_length))
        add(out, s + boom_lag, amp(clack_level + BOOM_DB) * strike(shell, boom_length))
    return out


def scene():
    """The work on the table, its room and the still air meet as left and right."""
    crackle, rub = strain()
    breaking = snaps() + rips() + bending(crackle, rub) + ties(crackle)
    plastic = radiated(breaking + gap_ring(breaking) + scrapes() + flexes())
    work = plastic + slaps() + drops() + twang() + slide()
    mid, side = work + room(work) + bumps() + rumble() + still_air()
    return np.array([mid + side, mid - side])


def record(dry):
    """The left microphone is nearer; peaks stop at full scale and then the top is cut off."""
    padded = np.pad(dry, ((0, 0), (0, next_fast_len(N + len(RING)) - N)))
    hz, size = grid(padded), padded.shape[1]
    lean = amp(np.outer([0.5, -0.5], along(LEFT_LEAN, hz)))
    leaning = irfft(rfft(padded) * lean, size)
    return irfft(rfft(np.clip(leaning, -1, 1)) * (hz < TOP_HZ), size)[:, :N]


dry = scene()
out = record(dry)
pcm_store(out)
```